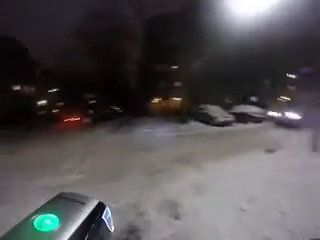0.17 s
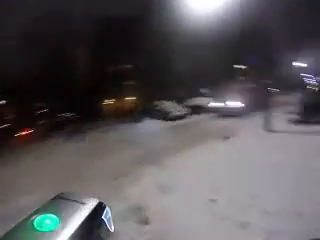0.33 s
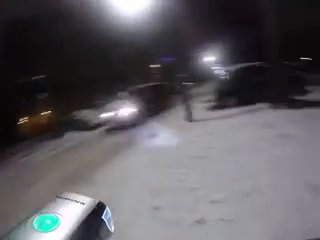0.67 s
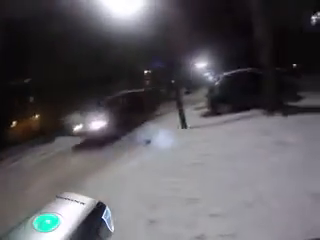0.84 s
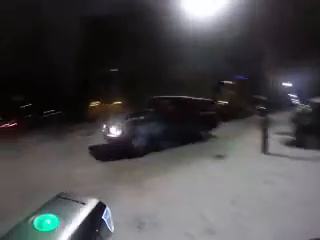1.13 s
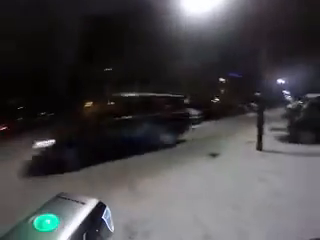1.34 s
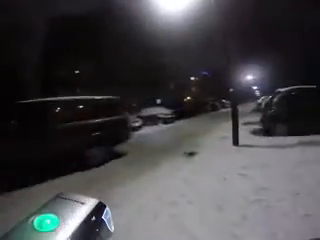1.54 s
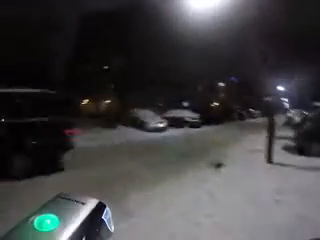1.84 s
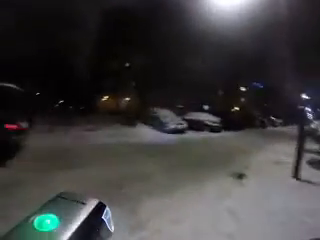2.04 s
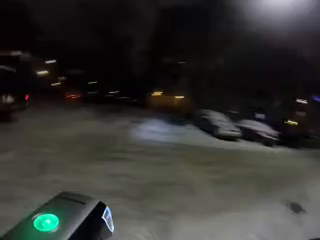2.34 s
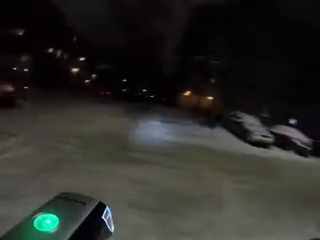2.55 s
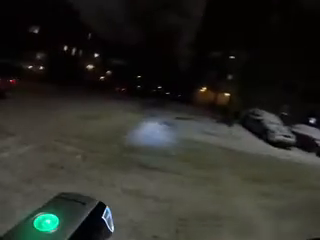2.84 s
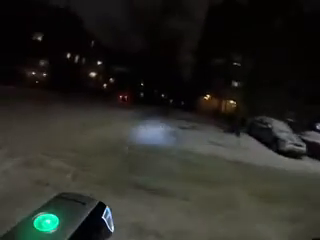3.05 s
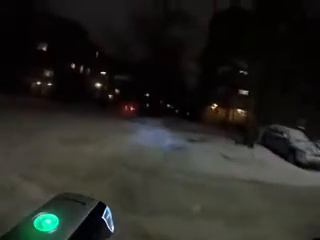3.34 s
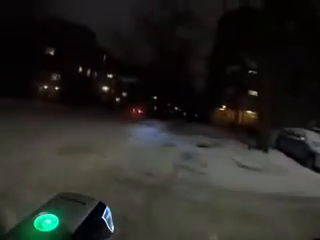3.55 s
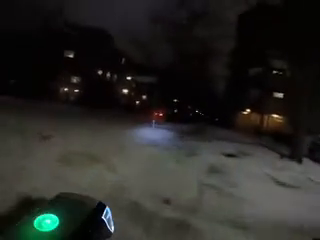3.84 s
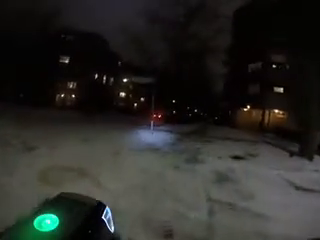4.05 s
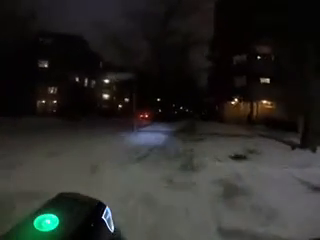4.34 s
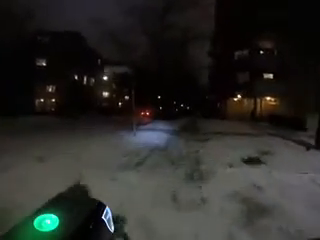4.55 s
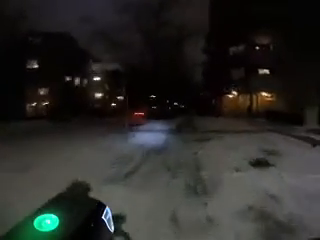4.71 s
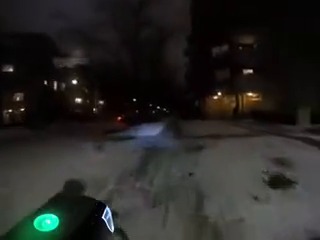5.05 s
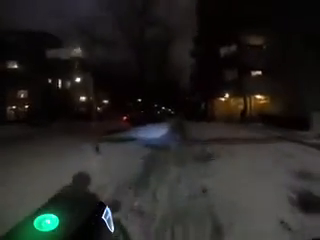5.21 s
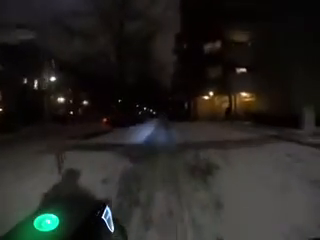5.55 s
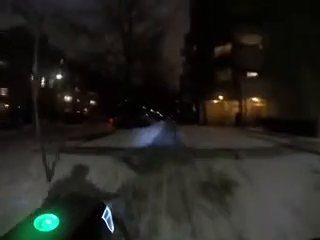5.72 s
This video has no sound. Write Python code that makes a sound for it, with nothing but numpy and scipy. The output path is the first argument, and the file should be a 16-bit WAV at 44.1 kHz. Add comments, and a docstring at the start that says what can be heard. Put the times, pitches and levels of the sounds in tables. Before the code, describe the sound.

Close on a bicycle handlebar outdoors at night: tyres crunch on snow under a low rumble. A hard rattling knock comes early, a car hisses past on slush around one and a half seconds, then deep bass thumps, dry clicks and small crust snaps grow frequent to the end.

```python
"""A camera clamp on a bicycle handlebar sways near 51 Hz: bumps restart sines, random shaking adds on.
Knocks strike the resonances of frame and housing, dry bright clicks come in runs of noise bursts, and
tyres crunch, snap and scuff on frozen snow: grainy or swelling noise, partly heard through the housing.
Low noise makes wind, road jolts and drone; a car hisses past on slush and a thin sine whistles once."""
import sys
import numpy as np
from scipy import signal
from scipy.fft import rfft, irfft, next_fast_len
from scipy.io import wavfile
from scipy.ndimage import map_coordinates

SR = 44100
rng = np.random.default_rng(int(sys.argv[2]) if len(sys.argv) > 2 else 0)


def transcribe(u):
    """Save the signal u as a 16-bit wav file named by the first command-line argument.

    u: samples, shape (n,) or (channels, n), limited to [-1, 1]; the rate is SR.
    q: integer samples, one column per channel.
    """
    v = np.clip(np.atleast_2d(u).T, -1, 1)
    q = np.round(v * 32767).astype(np.int16)
    wavfile.write(sys.argv[1], SR, q)


N = 259308

# Resonances. Each row: centre in Hz, width in Hz, relative level in dB.
# Dull and sharp modes of the housing, modes of the frame, metal ringing on hard blows, high chirp.
DULL_MODES = [(442, 30.6, 0), (608, 110, -15), (927, 72, -25)]
SHARP_MODES = [(1014, 47, -8), (1245.5, 31, -1.5), (1471, 160, -5), (1824, 57, 1.5), (1948, 73, 3),
               (2244, 102.5, 4), (2443, 154, -5.5), (2683, 63, -6.5), (2968, 320, -14), (3710, 75, -16.5)]
FRAME_MODES = [(162, 74, -3.5), (255.8, 26.2, 5), (342, 86, -4)]
BRACKET_MODES = [(1842, 17, 0), (2665, 19, -17), (2975, 380, -12), (1430, 120, -11.5)]
CHIRP_MODE = [(6320, 130, 0)]

# Source spectra. Each row: frequency in Hz, relative level in dB per Hz.
# Wind, road jolts, slush spray, clicks, fine hiss, cracks and scuffs.
WIND_SPECTRUM = [(5, -56), (14, -5), (28, 12.5), (38, 22), (55, -37.5), (300, -120)]
JOLT_SPECTRUM = [(45, -30.5), (63, -2), (100, -2), (130, -14.5), (250, -32.5), (1500, -120)]
SPRAY_SPECTRUM = [(2500, -11.5), (3300, -8), (3700, -12.5), (4300, -5), (4900, -16), (5600, -20),
                  (6450, -15), (7300, -25), (9000, -32.5), (13000, -40)]
CLICK_SPECTRUM = [(200, 13), (1000, 14.5), (3000, 9), (6000, -1), (10000, -14.5), (15000, -24)]
HISS_SPECTRUM = [(300, -14), (4000, -11), (8000, -23), (12000, -25), (16000, -40.5)]
CRACK_SPECTRUM = [(800, -24.5), (2600, -14.5), (3050, -2.5), (3300, -0.5), (4000, -19.5), (7500, -34),
                  (16000, -68)]
SCUFF_SPECTRUM = [(50, -22), (100, -0.5), (250, -6), (450, -17), (700, -29.5), (1500, -24.5), (4000, -78.5)]

# Transmission. Each row: frequency in Hz, gain in dB.
# The shell of the housing, soft rubber tyres that pass little treble, the colour of the car's wash.
SHELL_GAIN = [(500, -17), (1000, -1.5), (3200, 1.5), (4000, -9), (8000, -33.5), (16000, -56.5)]
RUBBER_GAIN = [(600, -4), (1000, 0.5), (3000, -22), (16000, -67)]
WASH_GAIN = [(600, -4), (1200, 2.5), (2000, -8), (3000, 7), (4000, -1.5)]

# Snow under the tyres. Each row: time in seconds, crunch level in dB.
CRUNCH_LEVEL = [(0.0, -42), (.45, -46), (.6, -43), (0.8, -41.5), (1.4, -51), (1.77, -45.5), (2.05, -46),
                (2.3, -41), (2.7, -41.5), (2.9, -50.5), (3.3, -49.5), (3.65, -49.5), (4.1, -49), (4.4, -53),
                (4.75, -47), (5.14, -45.5), (5.5, -53), (5.88, -46.5)]
# Unevenness of the snow. Each row: time in seconds, lumpiness in dB.
SNOW_LUMPINESS = [(0, 2), (2.7, 2.5), (3.1, 3.5), (5.88, 2.5)]
# Road jolts. Each row: time in seconds, level in dB.
JOLT_LEVEL = [(0, -38), (.24, -38.5), (.6, -31.5), (1.2, -39.5), (1.9, -38), (2.6, -25.5), (2.92, -36.5),
              (3.3, -29), (3.55, -31), (4.0, -26), (4.5, -31.5), (5.0, -23.5), (5.5, -28.5), (5.88, -25.5)]
# Steady shaking of the handlebar. Each row: time in seconds, swing in dB.
SHAKING_LEVEL = [(0, -18), (.7, -25), (.95, -29), (1.6, -22.5), (2.4, -21), (3.1, -20), (3.75, -12.5),
                 (4.3, -21), (5.25, -17.5), (5.88, -17.5)]

# Knocks. Each row: time in seconds, then relative dB of the blow, push on the frame, push on the housing.
KNOCK_EVENTS = [(0.302, -21, 13, 13), (0.335, -4.5, 33, 25), (0.375, -11, 26, 31), (0.545, -15.5, 9, -8),
                (1.0609, -15.5, 26, 39.5), (1.7486, -28.5, 15.5, -15), (2.2053, -21, 1, 17.5),
                (2.676, -24, 21, 17.5), (2.826, -30, 21.5, 14), (2.8472, -27, 29.5, 20),
                (3.3501, -24, 20, 13), (3.9736, -24, 1.5, 9), (4.011, -25.5, 16, -5),
                (4.266, -21.5, -0.5, 20), (4.783, -25.5, 11.5, 15.5), (5.03, -22, 18, 4),
                (5.2048, -24.5, 13.5, -6)]
# Runs of clicks. Each row: time of the main click in seconds, its relative level in dB, fade in dB a click.
CLICK_RUNS = [(0.386, -34, 21), (.475, -36, 18), (0.545, -21, 11), (2.848, -20.5, 11), (2.859, -18.5, 19),
              (3.394, -15, 11.5), (3.469, -26.5, 4.5), (4.096, -31, 21), (4.192, -29, 5),
              (4.324, -22, 17.5), (4.336, -21.5, 6), (4.388, -27, 1.8), (4.491, -33.5, 1.5),
              (5.033, -27, 10), (5.133, -19.5, 23), (5.362, -17.5, 15.5), (5.448, -18.5, 9.5),
              (5.423, -26, 14), (5.576, -20, 10), (5.713, -27, 1.5), (5.763, -17.5, 5.5), (5.852, -26.5, 8)]
# Drops of the wheel into a rut. Each row: start in seconds, relative level in dB, pitch in Hz.
LURCH_EVENTS = [(2.795, -1.5, 58), (2.856, 1, 45.6), (3.384, 2.5, 31.33), (4.037, -3.5, 50.32),
                (5.358, 0, 50.6), (5.574, -3.5, 60.4), (5.765, -3.5, 32)]
# Bumps that set the clamp swinging. Each row: start in seconds, swing in dB, T60 in seconds, pitch in Hz.
BUMP_EVENTS = [(.975, -10, 0.23, 52.5), (1.065, -3, 0.81, 53.9), (2.068, -12.5, 1.4, 54.05),
               (2.256, -8.5, 2.3, 52.8), (2.39, -14.5, 1, 44.7), (2.554, -9, 0.85, 53.46),
               (2.794, -3.5, 0.38, 51.3), (2.857, -15, 1.7, 51.2), (3.257, -7.5, 1.08, 52.77),
               (3.441, -8.5, 0.93, 52.1), (4.038, -4.5, 1.14, 50.66), (4.273, -4.5, 1.8, 50),
               (4.596, -8.5, 0.46, 50.15), (4.815, -6.5, 0.89, 51.9), (4.997, -5, 0.48, 53.1),
               (5.092, -4, 0.34, 53.4), (5.403, -9.5, 1.54, 51.76), (5.574, -9, 0.39, 46.8),
               (5.694, -8, 0.57, 60.1)]
# The tyre scuffing over a ridge. Each row: start in seconds, length in seconds, level in dB.
SCUFF_EVENTS = [(0.047, 0.087, -30), (0.836, 0.028, -31.5), (1.752, 0.044, -32.5), (5.319, 0.06, -37.5),
                (5.665, 0.097, -40)]
# Plates of crust snapping under the tyre. Each row: time in seconds, relative level in dB.
SNAP_EVENTS = [(.273, -24), (0.559, -18), (.646, -24), (1.897, -22), (3.16, -23.5), (3.243, -26),
               (3.2658, -30), (3.302, -28.5), (3.332, -26), (3.4246, -25.5), (3.763, -24), (4.053, -30.5),
               (4.086, -33.5), (4.141, -33), (4.585, -30), (4.6358, -29.5), (4.672, -28.5), (4.7546, -29),
               (4.987, -26), (5.0565, -26), (5.0947, -31.5), (5.2226, -32), (5.2904, -31.5), (5.669, -30),
               (5.7674, -30)]
# Short high chirps. Each row: time in seconds, relative level in dB.
CHIRP_EVENTS = [(1.882, -28.5), (2.512, -33)]

# Car: spray level at the nearest moment, that moment, time to drive its nearest distance, power of 1 / r.
CAR_DB, PASS_S, NEAR_S, FALL = -51.5, 1.44, 0.86, 2.64
SQUEAK_S, SQUEAK_DB, SQUEAK_RISE_S, SQUEAK_FALL_S = 0.41, -63, 0.035, 0.2
WIND_DB, WIND_GROWS = -2, 0.78  # over the mean shaking; dB for each dB of shaking
DRONE_DB, DRONE_CRUNCH = -45, 0.56  # mean level; dB for each dB of crunch
CLICK_GAP_S, CLICK_SCATTER_DB = 0.01, 3.5  # mean gap between clicks; spread of their levels
BUILD = 1.2  # a run builds up this much faster than it fades
DRAG_DB, DRAG_T60_S = -2, 0.05  # energy of the rough drag relative to its push
SWAY_HZ, SWAY_WANDER_HZ = 51.53, 1.97  # pitch of the steady swing and its drift
SHAKE_RATE = 12  # random points a second in the shaking
BUMP_RISE_S = 0.014
END_CLICK_DB, END_CLICK_RISE_DB_PER_S = -41, 1.7  # click level over the swing at the start, and its rise
TOP_HZ = 15800  # band limit


def amp(db):
    """Decibel law: 20 dB for each factor of ten in amplitude."""
    return 10 ** (np.asarray(db) / 20)


def unit(x):
    """Power normalisation: x at rms 1."""
    return x / np.sqrt(np.mean(x ** 2) + 1e-20)


def curves(rows):
    """Linear interpolation: one value per sample for each column after the time."""
    s, *cols = np.transpose(rows)
    return [np.interp(np.arange(N) / SR, s, c) for c in cols]


def wobble(rate):
    """Spline interpolation of random points, rate of them a second, into a smooth curve."""
    return map_coordinates(rng.standard_normal(N // 100), [np.arange(N) * rate / SR])


def filtered(x, response):
    """Linear filtering: the spectrum of x times a complex response of frequency."""
    m = next_fast_len(N + SR // 2)
    return irfft(rfft(x, m) * response(np.fft.rfftfreq(m, 1 / SR)), m)[..., :N]


def coloured(x, points):
    """Spectral shaping: gain in dB interpolated over log frequency."""
    f, db = np.transpose(points)
    return filtered(x, lambda hz: amp(np.interp(np.log(hz + 1), np.log(f + 1), db)))


def rung(x, modes):
    """Modal superposition: damped second-order resonances summed with alternating sign."""
    def response(f):
        return sum((-1) ** k * amp(db) * 1j * f * width / (hz * hz - f * f + 1j * f * width)
                   for k, (hz, width, db) in enumerate(modes))
    return filtered(x, response)


def bursts(times, levels_db, t60, rise):
    """Impulsive excitation: at each time, decaying noise with the energy given by its level."""
    out, t = np.zeros(N + SR), np.arange(SR // 20) / SR
    for s, db, decay in np.broadcast(times, levels_db, t60):
        envelope = (1 - np.exp(-t / rise)) * amp(-60 * t / decay)
        burst = envelope * rng.standard_normal(len(t))
        out[round(s * SR):][:len(t)] += amp(db) * burst / np.linalg.norm(burst)
    return out[:N]


def grit(spread_db, rate, lumpy_db):
    """Granular fracture: dense noise in which a few samples stand out, in lumps."""
    grain_db = spread_db * np.minimum(rng.exponential(size=N), 8)
    return rng.standard_normal(N) * amp(grain_db + lumpy_db * wobble(rate))


def car():
    """Spreading with distance: slush spray, and a wash through the housing, swell and fall by 1 / r."""
    t = np.arange(N) / SR
    level_db = CAR_DB - FALL * 10 * np.log10(1 + ((t - PASS_S) / NEAR_S) ** 2)
    through_housing = coloured(rung(rng.standard_normal(N), SHARP_MODES), SHELL_GAIN)
    wash = unit(coloured(through_housing, WASH_GAIN))
    spray = unit(coloured(grit(1.0, rate=30, lumpy_db=2.0), SPRAY_SPECTRUM))
    return amp(level_db) * (spray + amp(0.5) * wash)


def squeak():
    """Frequency modulation: one thin whistle, a sine of slightly unsteady pitch."""
    whistle_hz = 5220 + 12 * wobble(25)
    corners = SQUEAK_S + np.cumsum([0, SQUEAK_RISE_S, SQUEAK_FALL_S])
    level = np.interp(np.arange(N) / SR, corners, [0, 1, 0])
    return amp(SQUEAK_DB) * level * np.sin(2 * np.pi * np.cumsum(whistle_hz) / SR)


def wind(shake_db):
    """Turbulent pressure: gusty low noise on the microphone port, louder with the shaking."""
    faster = shake_db - shake_db.mean()
    level_db = shake_db.mean() + WIND_DB + WIND_GROWS * faster
    gusts = amp(3.2 * wobble(10.0))
    return amp(level_db) * unit(gusts * coloured(rng.standard_normal(N), WIND_SPECTRUM))


def jolts(lumps_db):
    """Random excitation by the road: bass noise of fluctuating strength."""
    level_db, = curves(JOLT_LEVEL)
    flutter = amp(lumps_db + 2.7 * wobble(22))
    return amp(level_db) * unit(flutter * coloured(rng.standard_normal(N), JOLT_SPECTRUM))


def drone(lumps_db):
    """Forced resonance: gritty shaking rings the frame and the dull housing modes."""
    crunch_db, = curves(CRUNCH_LEVEL)
    rougher = crunch_db - crunch_db.mean()
    level_db = DRONE_DB + DRONE_CRUNCH * rougher + 0.34 * lumps_db
    shaking = grit(2, rate=35, lumpy_db=2.5)
    return amp(level_db) * unit(coloured(rung(shaking, FRAME_MODES + DULL_MODES), RUBBER_GAIN))


def rumble():
    """Superposition of wind, road jolts and the drone of the frame."""
    shake_db, = curves(SHAKING_LEVEL)
    lumps_db = 0.5 * wobble(6)  # rough patches act on jolts and drone together
    return wind(shake_db) + jolts(lumps_db) + drone(lumps_db)


def tyres():
    """Fracture noise through a resonant shell: crunching snow, and a fine hiss that follows its level."""
    level_db, = curves(CRUNCH_LEVEL)
    lumpy_db, = curves(SNOW_LUMPINESS)
    breaking = grit(3.4, rate=95, lumpy_db=lumpy_db)
    crunch = unit(coloured(rung(breaking, SHARP_MODES), SHELL_GAIN))
    hiss_db = -21.5 + 4.1 * wobble(5.7) + 2.8 * wobble(30)  # relative to the crunch
    hiss = amp(hiss_db) * unit(coloured(rng.standard_normal(N), HISS_SPECTRUM))
    return amp(level_db) * (crunch + hiss)


def scuffs():
    """Friction noise: a swell of rough low noise for each scuff."""
    t = np.arange(N) / SR
    swell = np.zeros(N)
    for s, length, db in SCUFF_EVENTS:
        progress = np.clip((t - s) / length, 0, 1)
        swell += amp(db) * np.sqrt(np.abs(np.sin(np.pi * progress)))
    return swell * unit(coloured(rng.standard_normal(N), SCUFF_SPECTRUM))


def snaps():
    """Brittle fracture: short bursts ring the sharp housing modes, and two chirps ring a high mode."""
    s, db = np.transpose(SNAP_EVENTS)
    chirp_s, chirp_db = np.transpose(CHIRP_EVENTS)
    breaks = bursts(s, db + 27.5, t60=0.017, rise=0.0004)
    crust = coloured(rung(breaks, SHARP_MODES), SHELL_GAIN)
    chirps = rung(bursts(chirp_s, chirp_db + 22.0, t60=0.034, rise=0.003), CHIRP_MODE)
    return crust + chirps


def clicks():
    """Trains of short broadband pulses: dry bright clicks in runs that build to a main click and fade."""
    s, db, fade_db = np.transpose(CLICK_RUNS)[:, :, None]
    k = np.arange(-3, 13)  # place in the run; the main click is 0 and is not scattered
    others = k != 0
    scatter_db = CLICK_SCATTER_DB * rng.standard_normal((len(CLICK_RUNS), len(k))) * others
    click_db = db - fade_db * np.maximum(k, -BUILD * k) + scatter_db
    jitter_s = 0.0026 * rng.standard_normal(click_db.shape) * others
    when = s + CLICK_GAP_S * k + jitter_s
    t60 = np.interp(click_db, [-33, -22], [0.004, 0.013])  # weak clicks are the shortest
    return coloured(bursts(when, click_db, t60=t60, rise=0.0071), CLICK_SPECTRUM)


def knocks():
    """Impact excitation of modes: blows from the road crack, rattle the shell and push the low modes."""
    s, sharp_db, thud_db, tock_db = np.transpose(KNOCK_EVENTS)

    def blow(db):
        """Ideal impulse: one sample, 30 samples after each knock's time."""
        return np.bincount((s * SR).astype(int) + 30, amp(db), N)

    def push(db):
        """Impulse and friction: a blow with a rough drag."""
        return blow(db - 2.5) + bursts(s, db + DRAG_DB, t60=DRAG_T60_S, rise=0.0024)

    scrape_s = np.interp(sharp_db, [-17, -3], [0.045, 0.014])  # soft contacts drag on, hard ones are brief
    rattle = rung(bursts(s, sharp_db + 29, t60=scrape_s, rise=0.0005), SHARP_MODES)
    crack_db = 2.0 * sharp_db  # doubled in dB, so cracks favour hard blows
    ring = rung(blow(crack_db + 44), BRACKET_MODES)
    crack = coloured(bursts(s, crack_db + 29.5, t60=0.016, rise=0.00065), CRACK_SPECTRUM)
    low = rung(push(thud_db), FRAME_MODES) + rung(push(tock_db), DULL_MODES)
    return coloured(rattle + ring, SHELL_GAIN) + crack + coloured(low, RUBBER_GAIN)


def lurches():
    """Strongly damped oscillation: each drop is about one and a half cycles of heavy bass."""
    out, t = np.zeros(N + SR), np.arange(SR // 8) / SR
    for s, db, hz in LURCH_EVENTS:
        cycles = hz * t
        envelope = cycles * np.exp(1 - (1.68 * cycles) ** 2)
        out[round(s * SR):][:len(t)] += amp(db) * np.sin(2 * np.pi * cycles) * envelope
    return out[:N]


def swing():
    """Free and forced oscillation: bumps restart a decaying sine; random shaking is added throughout."""
    t = np.arange(N) / SR
    ringing = np.zeros(N)
    for s, db, t60, hz in BUMP_EVENTS:
        age = np.maximum(t - s, 0)
        grip = 1 - np.exp(-(age / BUMP_RISE_S) ** 2)  # the new swing replaces the old
        fresh = amp(db - 60 * age / t60) * np.sin(2 * np.pi * hz * age)
        ringing = ringing + grip * (fresh - ringing)
    drift = np.cumsum(SWAY_WANDER_HZ * wobble(11)) / SR  # in cycles
    shake_db, = curves(SHAKING_LEVEL)
    envelope = np.hypot(wobble(SHAKE_RATE), wobble(SHAKE_RATE)) / np.sqrt(2)
    shaking = amp(shake_db) * envelope * np.sin(2 * np.pi * (SWAY_HZ * t + drift))
    return np.sqrt(2) * (ringing + shaking)  # levels are rms


def clamp():
    """Oscillation with pulses at its extremes: the camera swings and lurches, with a short click at each."""
    motion = swing() + lurches()
    ends = np.flatnonzero(np.diff(np.sign(np.diff(motion))))
    over_swing_db = END_CLICK_DB + END_CLICK_RISE_DB_PER_S * np.arange(N) / SR
    click_db = over_swing_db + 20 * np.log10(np.abs(motion) + 1e-6) + 4 * wobble(90)
    end_clicks = bursts(ends / SR, click_db[ends], t60=0.006, rise=0.00018)
    return motion + coloured(end_clicks, CLICK_SPECTRUM)


def scene():
    """Superposition: all sources add at one microphone."""
    background = car() + squeak() + rumble()
    snow = tyres() + scuffs() + snaps()
    return (background + snow + clicks() + knocks() + clamp())[None]


def record(dry):
    """Saturation and band limiting: peaks round off near full scale, then a steep low-pass filter."""
    soft = dry / (1 + np.abs(dry / 0.99) ** 12) ** (1 / 12)
    return signal.sosfiltfilt(signal.cheby2(16, 50, TOP_HZ, fs=SR, output="sos"), soft)


dry = scene()
out = record(dry)
transcribe(out)
```